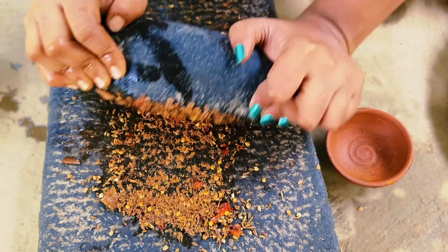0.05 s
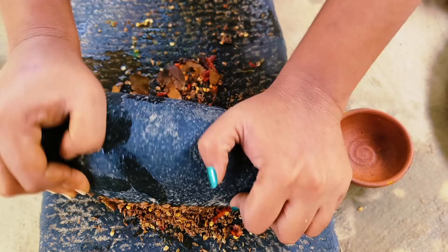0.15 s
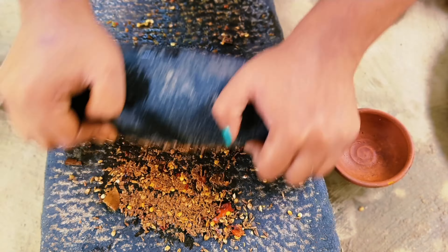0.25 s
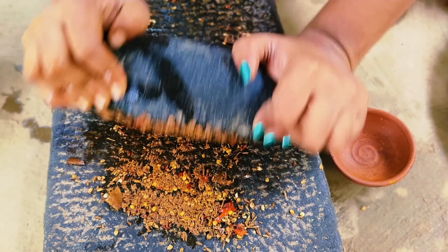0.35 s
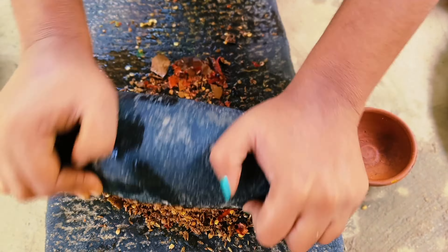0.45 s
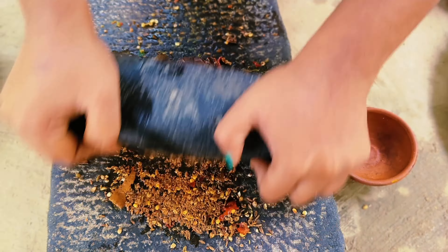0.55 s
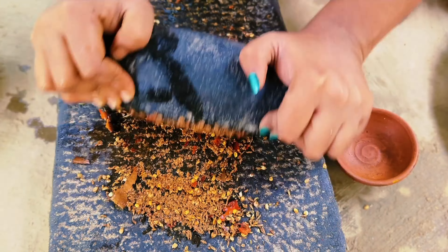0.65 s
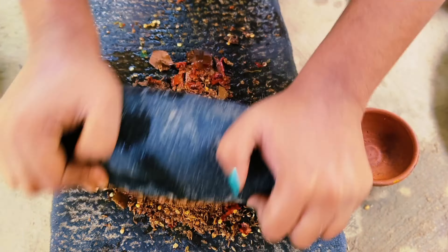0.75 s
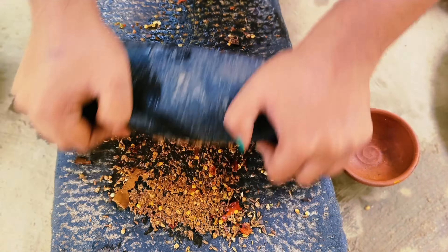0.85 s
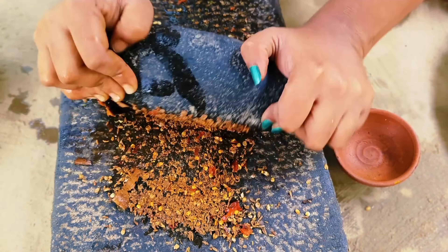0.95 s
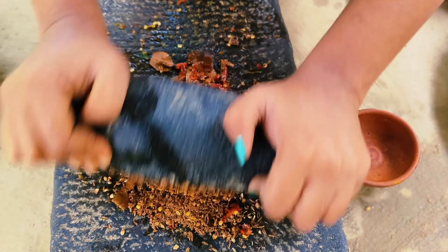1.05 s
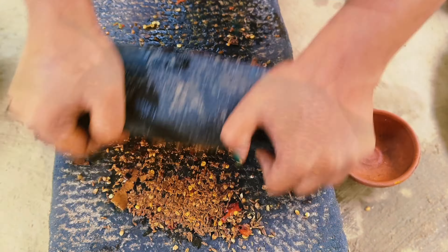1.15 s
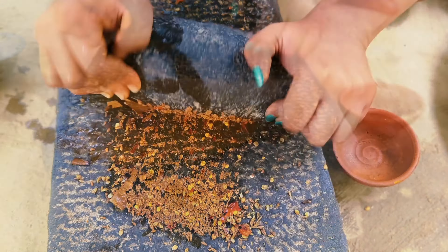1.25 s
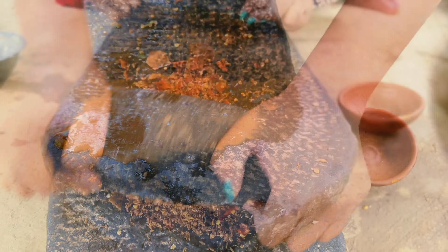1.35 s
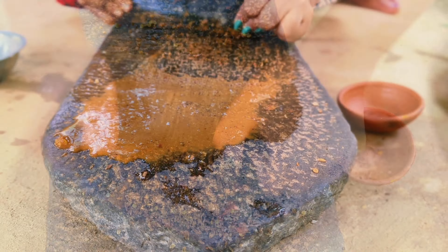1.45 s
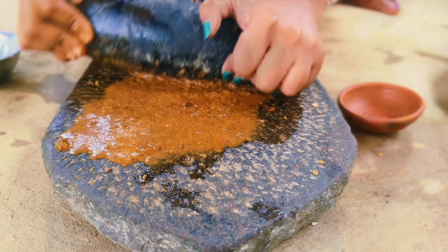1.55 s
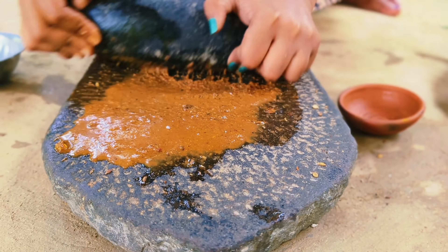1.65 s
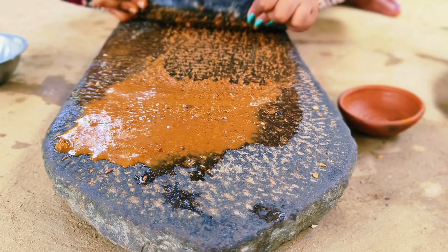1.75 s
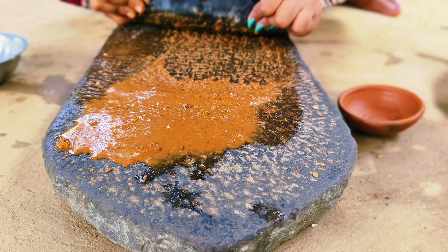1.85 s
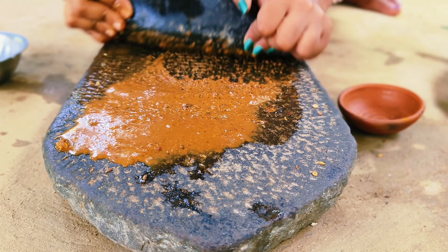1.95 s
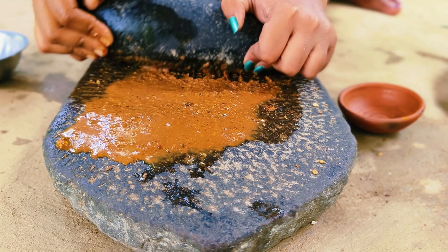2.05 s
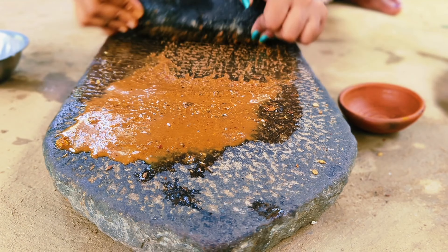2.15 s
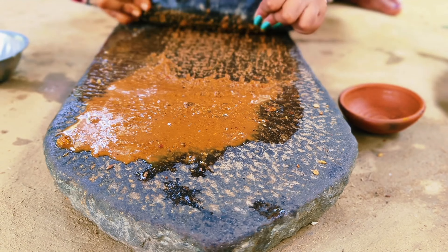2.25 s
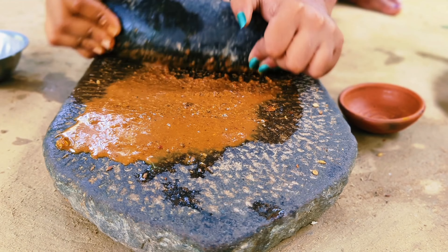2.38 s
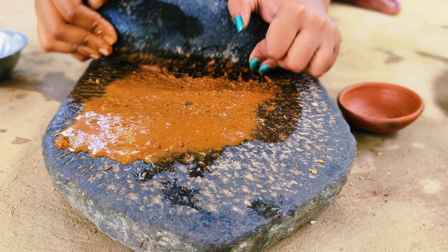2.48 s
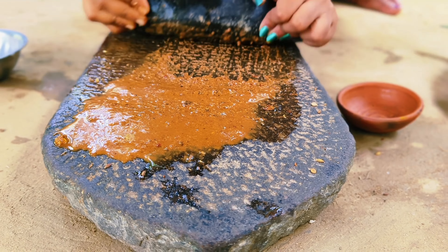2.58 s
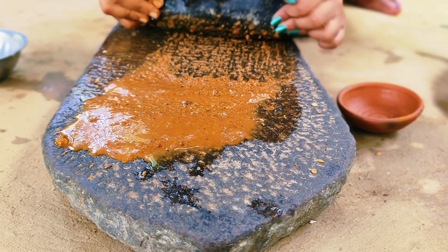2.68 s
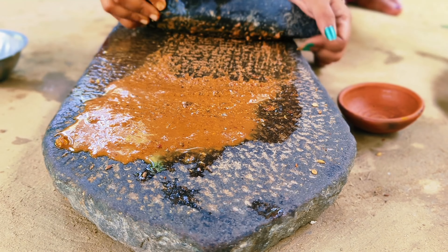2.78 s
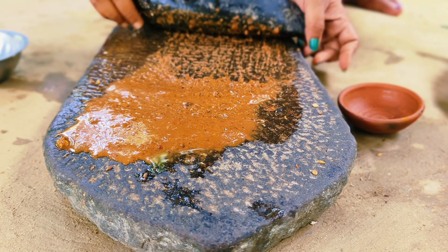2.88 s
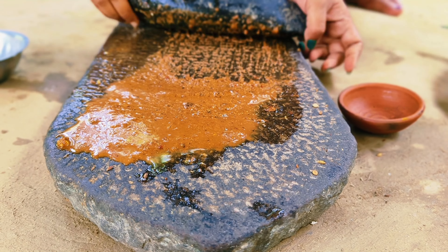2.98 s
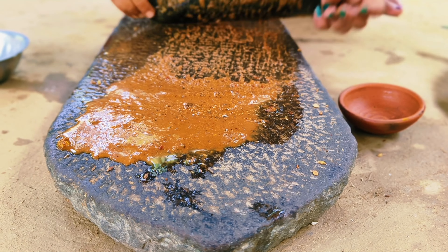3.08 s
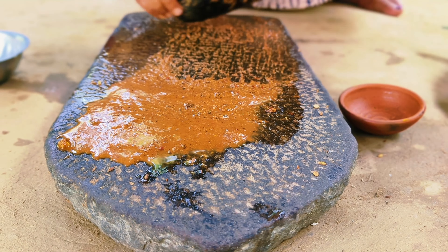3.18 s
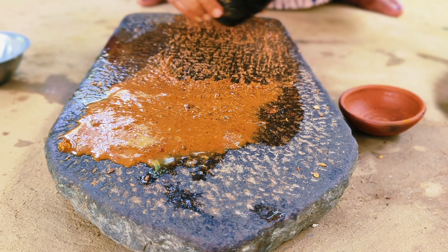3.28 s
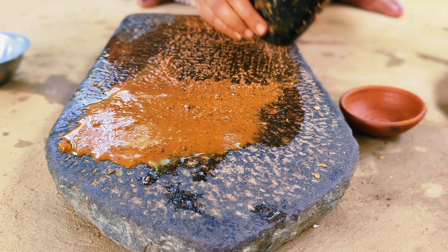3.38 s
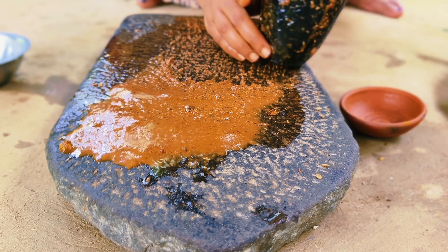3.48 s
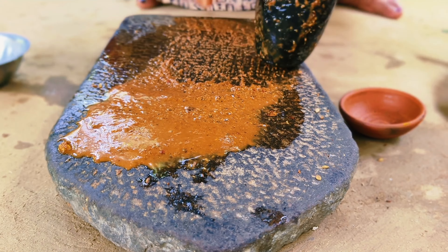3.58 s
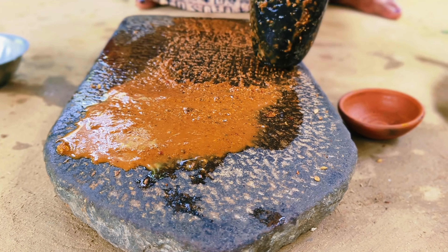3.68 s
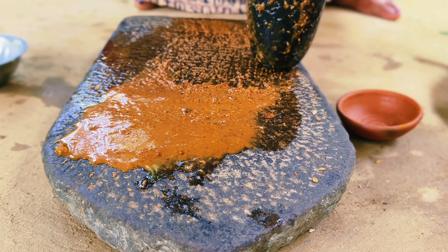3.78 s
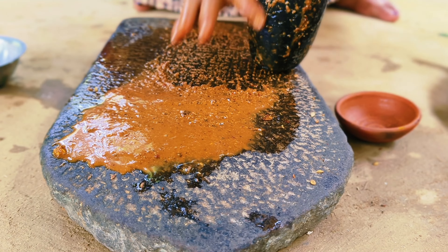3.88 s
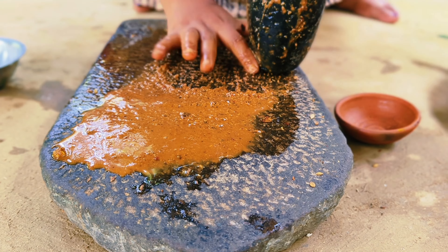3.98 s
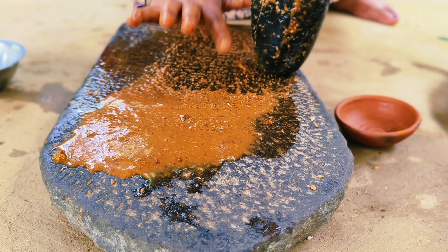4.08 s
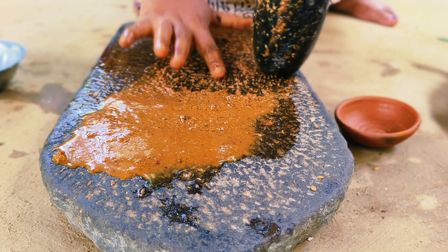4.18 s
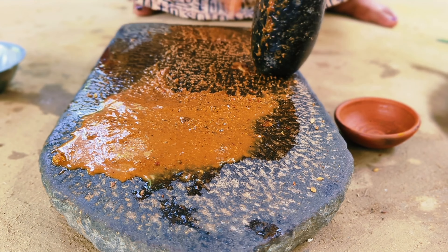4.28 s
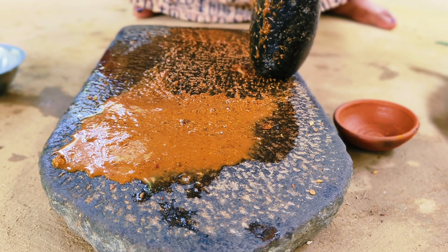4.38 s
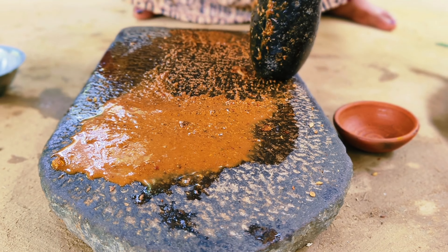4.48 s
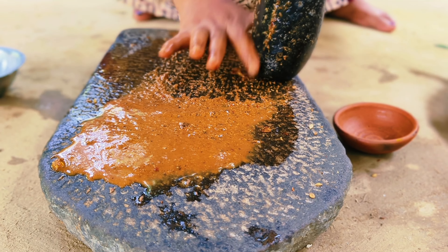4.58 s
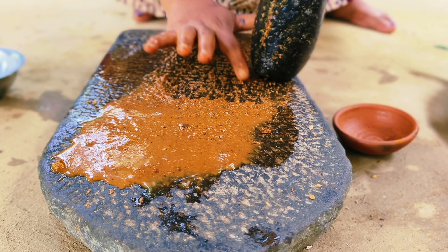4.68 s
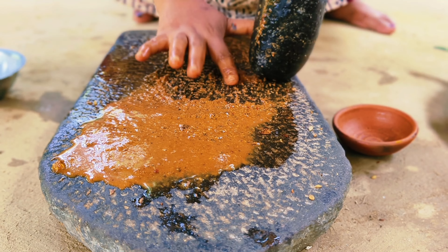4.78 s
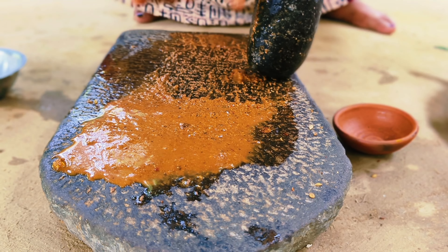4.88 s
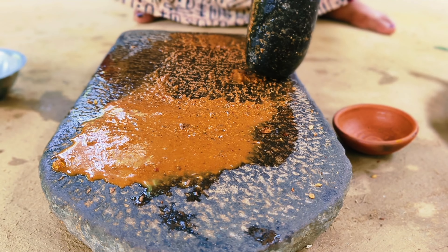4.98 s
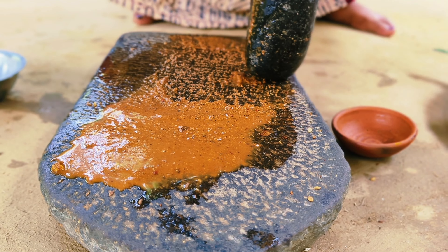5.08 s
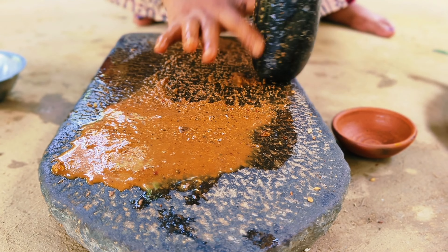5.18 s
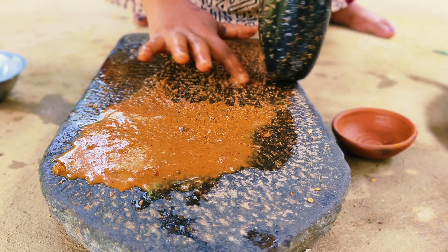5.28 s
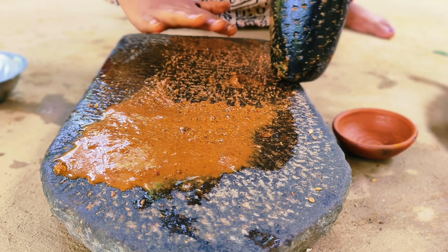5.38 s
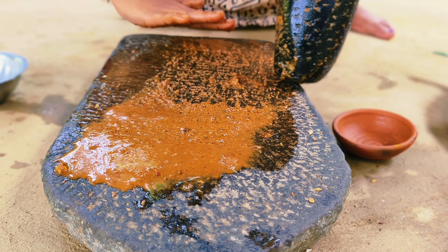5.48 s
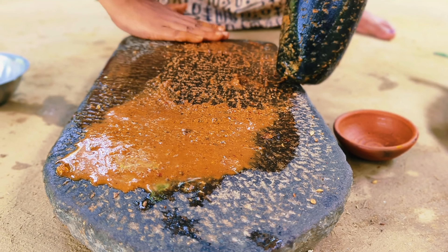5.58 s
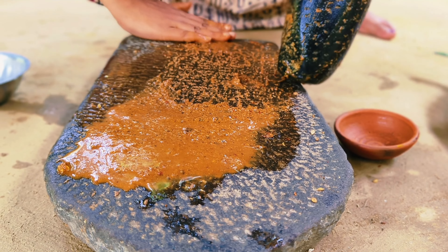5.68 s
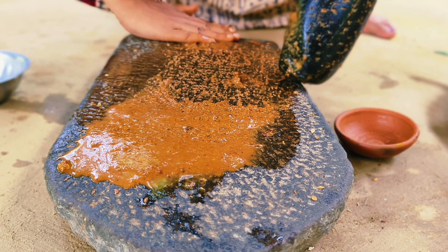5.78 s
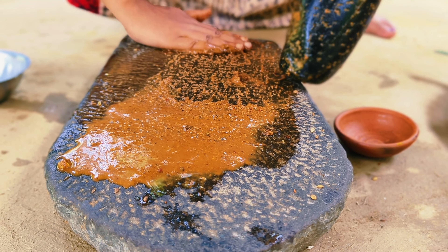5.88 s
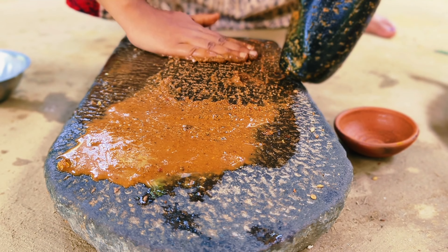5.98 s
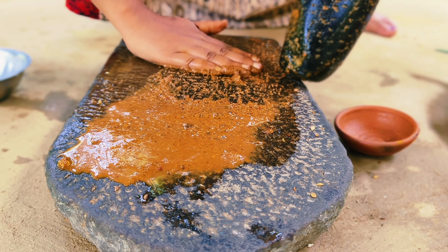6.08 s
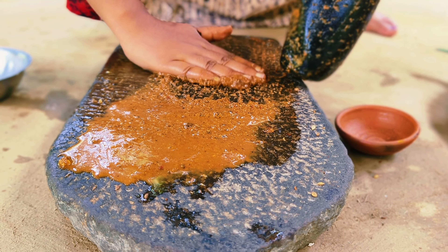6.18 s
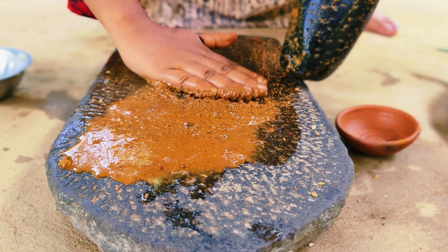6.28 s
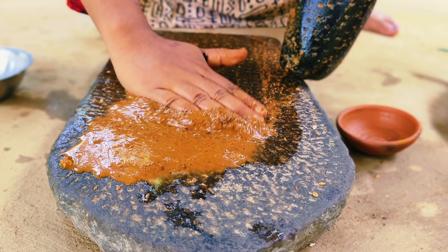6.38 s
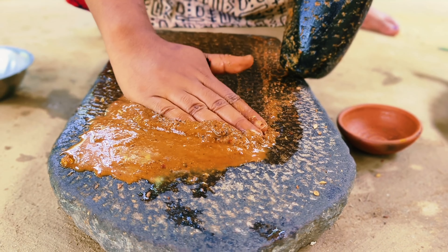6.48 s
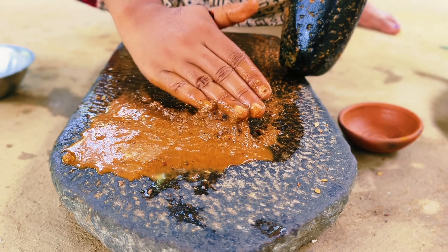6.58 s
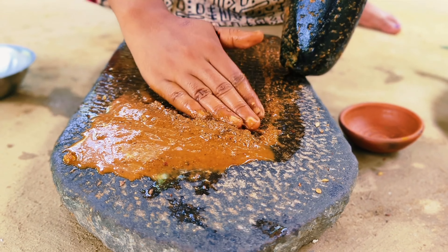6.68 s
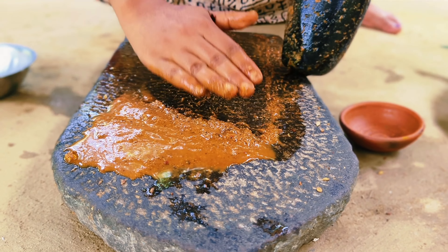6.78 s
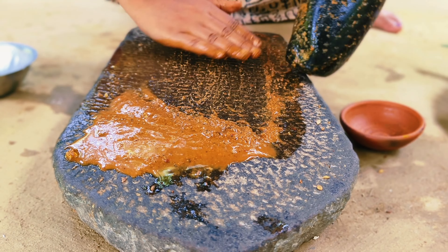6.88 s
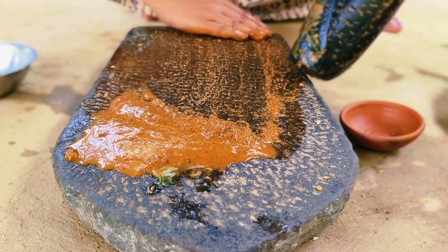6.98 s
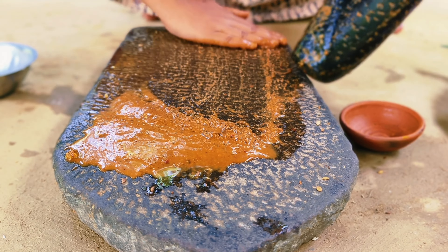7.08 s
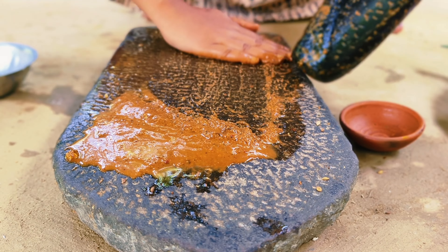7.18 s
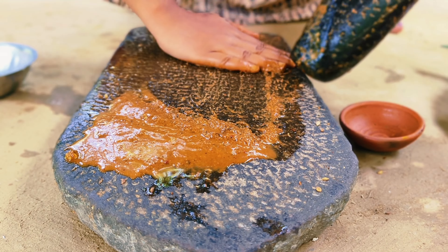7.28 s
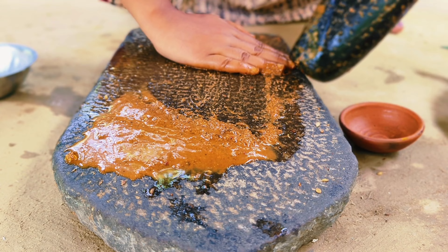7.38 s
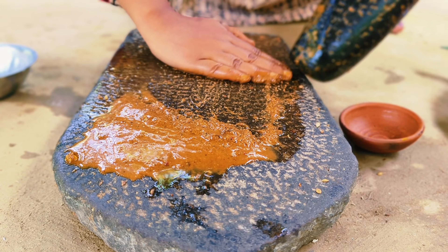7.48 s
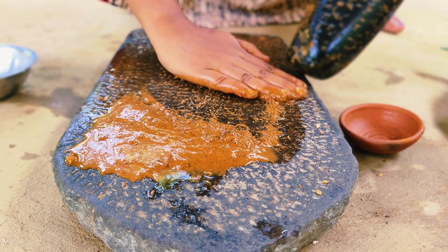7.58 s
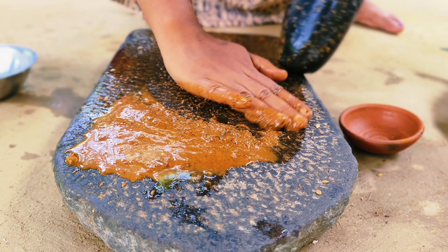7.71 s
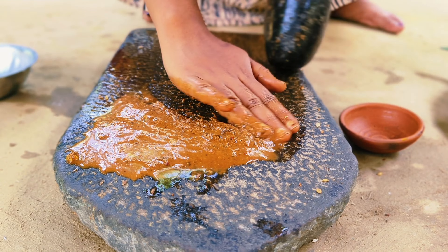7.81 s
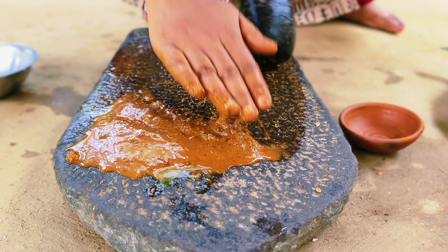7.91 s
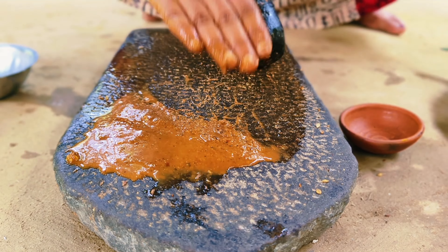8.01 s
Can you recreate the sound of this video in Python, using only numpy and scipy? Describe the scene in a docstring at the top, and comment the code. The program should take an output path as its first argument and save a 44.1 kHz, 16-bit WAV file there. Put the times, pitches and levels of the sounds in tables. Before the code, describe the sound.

Close up in an open walled yard, a heavy stone roller rasps back and forth over dry seeds with sharp crackle and hard knocks. At about a second and a half the strokes become wetter, more hollow and ringing. They stop, and one loud clunk stands the roller on end. Then small wet smacks and soft hand wipes follow, while a bird repeats a rising chirp, a far horn sounds faintly and a slow engine throbs.

```python
"""A stone roller is pushed to and fro over spices on a stone slab in a walled yard, dry seeds first, then wet paste.
Clicks excite the stone modes as chatter and knocks, one blow standing it on end; seeds crack as filtered grains.
Small smacks, drips and faint scrapes are ringing noise puffs; a hand wipes the paste as fine grains over a hiss.
A bird repeats a rising swept sine, others whistle farther off, a horn sounds in partials.
A slow engine throbs in orders of its firing rate, over soft banded background noise."""
import sys
import numpy as np
from scipy import signal
from scipy.fft import rfft, irfft
from scipy.io import wavfile
from scipy.ndimage import uniform_filter1d

SR = 44100
rng = np.random.default_rng(int(sys.argv[2]) if len(sys.argv) > 2 else 0)


def int16_out(signal):
    """Quantize to a 16-bit WAV file."""
    q = np.round(np.clip(np.atleast_2d(signal).T, -1, 1) * 32767)
    wavfile.write(sys.argv[1], SR, q.astype(np.int16))


N = 355005


def amp(db):
    """Decibels to gain."""
    return 10 ** (np.asarray(db) / 20)


def rms_one(x):
    """Scaled to rms 1."""
    return x / np.sqrt(np.mean(x ** 2) + 1e-20)


def in_time(rows):
    """Columns of a curve at every sample; the first column is seconds."""
    time_s, *columns = np.transpose(rows)
    return [np.interp(np.arange(N) / SR, time_s, column) for column in columns]


def at_hz(points):
    """A spectrum read at every FFT bin, linear in log frequency."""
    hz, value = np.transpose(points)
    return np.interp(np.log(np.fft.rfftfreq(N, 1 / SR) + 1), np.log(hz), value)


def coloured(x, spectrum):
    """Shaped by a spectrum in dB, rms 1."""
    return rms_one(irfft(rfft(x) * amp(at_hz(spectrum)), N))


def third_octave_index(base_hz):
    """Band number of every FFT bin; bands near a third of an octave well above base_hz."""
    return np.round(3 * np.log2(np.fft.rfftfreq(N, 1 / SR) / base_hz + 1))


def drift(rate_hz):
    """Slow chance of spread 1: two-pole lowpassed noise, computed at SR / 40."""
    r = np.exp(-80 * np.pi * rate_hz / SR)
    noise = rng.standard_normal(N // 40 + 2002)
    slow = signal.lfilter([1], [1, -2 * r, r * r], noise)[2000:]   # settled part
    return np.interp(np.arange(N) / 40, np.arange(len(slow)), rms_one(slow))


def grains(per_s, spread_db, channels=1):
    """Random clicks of uneven size and either sign."""
    size_db = spread_db * np.minimum(rng.exponential(1, (channels, N)), 4)
    sizes = amp(size_db) * rng.choice([-1, 1], (channels, N))
    return sizes * (rng.random((channels, N)) < per_s / SR)


def ring(clicks, hz, t60_s):
    """A two-pole mode with zeros at DC and Nyquist, so it passes nothing in the deep bass."""
    r, w = amp(-60 / (t60_s * SR)), 2 * np.pi * hz / SR
    return signal.lfilter([.5, 0, -.5], [1, -2 * r * np.cos(w), r * r], clicks + 1e-18)


def tone(hz, db):
    """A sine that follows a pitch curve."""
    return amp(db) * np.sin(2 * np.pi * np.cumsum(hz) / SR)


def high_pass(x, hz):
    """Third-order bass cut."""
    return signal.sosfilt(signal.butter(3, hz, "high", fs=SR, output="sos"), x)


def add(out, start_s, piece):
    """Mixes a piece in at a time."""
    i = round(start_s * SR)
    out[i:i + len(piece)] += piece[:N - i]


def tail(x, t60_s):
    """Diffuse echoes, other ones on each side: decaying noise of unit mean energy."""
    t = np.arange(round(t60_s * SR)) / SR
    echoes = rng.standard_normal((2, len(t))) * amp(-60 * t / t60_s)
    unit = echoes / np.sqrt(np.sum(echoes ** 2) / 2)
    return signal.fftconvolve(x[None], unit, axes=1)[:, :N]


def ports(x, lag_s, left_db):
    """Two microphone ports: a positive lag delays the right one; lag and balance may vary with pitch."""
    late = np.exp(-2j * np.pi * np.fft.rfftfreq(N, 1 / SR) * lag_s)
    gains = np.array([amp(left_db / 2) + 0 * late, late * amp(-left_db / 2)])
    return irfft(rfft(x) * gains, N)


# Background noise. Each row: time in seconds, level in dB, extra level below about 800 Hz in dB.
AIR_LEVEL = [(0.0, -53, -1), (1.05, -56.5, 4.5), (2.3, -68, 5.5), (2.69, -61.5, 6.5), (3.45, -55, 1),
             (3.7, -63.5, 3.5), (5.3, -59.5, 0), (5.45, -56.5, 4), (6.99, -55.5, 2.2), (8.05, -51.5, 1)]
# Its spectrum. Each row: frequency in Hz, relative density in dB.
AIR_COLOUR = [(100, 1), (170, -9.5), (310, -13), (414, -7.5), (800, -8), (973, -6.5), (1070, -3),
              (1750, -6), (4110, -19.5), (5060, -11), (9650, -33.5), (11900, -85), (15800, -62.5)]
# Correlation of the two sides. Each row: frequency in Hz, share from -1 to 1.
SIDE_LIKENESS = [(60, 0.42), (130, 0.9), (290, 0.47), (640, -0.45), (1410, -0.66), (3100, 0.44),
                 (6820, -0.65), (15000, 0.072)]


def air():
    """Soft background noise whose bands waver in level by chance; likeness of the sides varies with pitch."""
    mid, side = rfft(rng.standard_normal((2, N))) * amp(at_hz(AIR_COLOUR))
    alike = np.clip(at_hz(SIDE_LIKENESS), -1, 1)
    both = np.sqrt(1 + alike) * mid + np.sqrt(1 - alike) * side * [[1], [-1]]
    level_db, bass_db = in_time(AIR_LEVEL)
    band = third_octave_index(60)
    bands = 0
    for k in range(3, 24):
        waver_db = 2 * drift(9) + 2 * drift(2.5) + bass_db * (k < 12)
        bands = bands + irfft(both * (band == k), N) * amp(waver_db)
    return amp(level_db) * rms_one(bands)


# Distant engine. Each row: time in seconds, firings per second, level in dB.
ENGINE_RUN = [(.9, 18.2, -73), (1.0, 18.3, -66), (1.49, 17.9, -57.5), (3.45, 18.5, -46), (3.59, 18.4, -52),
              (5.3, 18.6, -50.5), (5.75, 17.9, -51.5), (6.24, 17.6, -49), (8.05, 18.3, -48.5)]
# Its orders. Each row: multiple of the firing rate, relative level in dB.
ENGINE_ORDERS = [(2, -9), (3, 0), (4, -6), (5, -4), (6, -11), (7, -16), (8, -19)]


def engine():
    """Low orders of the firing rate, each wavering in level and phase, over a dull rumble."""
    firing_hz, level_db = in_time(ENGINE_RUN)
    turns = np.cumsum(firing_hz) / SR
    orders = 0
    for k, order_db in ENGINE_ORDERS:
        gain = amp(order_db + 3 * drift(.7))
        orders = orders + gain * np.sin(2 * np.pi * (k * turns + .2 * drift(.5)))
    rumble_colour = [(30, -28.5), (60, 13.5), (95, 9.0), (140, -2.0), (230, -13.0), (500, -72)]   # Hz, dB
    rumble = coloured(rng.standard_normal(N), rumble_colour)
    return amp(level_db) * (rms_one(orders) + amp(-8) * rumble)


# Far whistles. Each row: start in seconds, length in seconds, start pitch in Hz, end pitch in Hz, level in dB.
WHISTLES = [(2.985, 0.054, 4980, 4160, -61), (3.05, 0.077, 3350, 2360, -51),
            (3.468, 0.016, 6000, 3760, -54.5), (3.512, 0.067, 3430, 2380, -56.5),
            (5.037, 0.038, 2740, 2696, -63), (5.311, 0.089, 2640, 2810, -65.5),
            (7.177, 0.033, 1900, 2110, -62), (7.878, 0.16, 2783, 2750, -57)]
# Far horn. Each row: start in seconds, length in seconds, nominal pitch in Hz,
# third, fourth and fifth partial in dB.
HORN = [(6.72, 0.16, 490, -74.5, -75, -64), (7.105, 0.23, 494, -71, -91, -63),
        (7.39, 0.11, 503, -85, -68.5, -76)]


def far_calls():
    """Gliding sines for the whistles, stacked partials for the horn, on one shared level waver."""
    out, waver_db = np.zeros(N), 5.5 * drift(22)
    for start_s, length_s, start_hz, end_hz, db in WHISTLES:
        size = round(length_s * SR)
        waver = waver_db[round(start_s * SR):][:size]
        whistle = tone(np.geomspace(start_hz, end_hz, size), db + waver)
        add(out, start_s, signal.windows.tukey(size, .4) * whistle)
    for start_s, length_s, hz, *partials_db in HORN:
        size = round(length_s * SR)
        waver = waver_db[round(start_s * SR):][:size]
        sag = np.linspace(1.01, .995, size)   # it sags and wavers on the wind
        for k, db in enumerate(partials_db, start=3):
            add(out, start_s, signal.windows.tukey(size, .5) * tone(k * hz * sag, db + waver))
    return out


# One call of the near bird, unscaled. Each row: time in seconds, pitch in Hz, relative level in dB.
CALL_SHAPE = [(0, 2560, -9.5), (0.014, 2688, 1), (0.039, 3235, 3.5), (.06, 3750, -0.5), (.072, 4500, 1),
              (.082, 5000, 1.5), (0.107, 4780, -9)]
# Its repeats. Each row: start in seconds, level in dB, length factor, pitch factor.
CALL_REPEATS = [(3.853, -56, 0.98, 1.07), (4.131, -53.5, 1.08, 1.014), (4.447, -52, 1.09, 1.014),
                (4.741, -52, 1.05, 1.01), (5.084, -52, 1.1, 1.02), (5.488, -54.5, 1, 1.017)]


def near_bird():
    """A near-sine sweep with a fast amplitude flutter."""
    out, (shape_s, shape_hz, shape_db) = np.zeros(N), np.transpose(CALL_SHAPE)
    for start_s, db, length, pitch in CALL_REPEATS:
        t = np.arange(round(shape_s[-1] * length * SR)) / SR
        flutter = 1 + 0.17 * np.sin(2 * np.pi * 95 * t)
        hz = pitch * np.interp(t, shape_s * length, shape_hz)
        level_db = db + np.interp(t, shape_s * length, shape_db)
        add(out, start_s, flutter * tone(hz, level_db))
    return out


# Faint steady treble hiss, dipping after the blow. Each row: time in seconds, level in dB.
HISS_LEVEL = [(2.6, -76), (2.8, -65), (3.46, -72), (3.56, -82), (3.9, -70.5), (5.7, -70), (8.05, -70)]
# Hand sweeps over paste. Each row: time of the peak in seconds, level in dB.
WIPES = [(3.998, -64), (5.9, -61), (6.321, -57.5), (7.16, -54.5)]
# Spectrum of hiss and wipes. Each row: frequency in Hz, relative density in dB.
WIPE_COLOUR = [(900, -37), (2200, -10), (5000, 5.5), (7000, 4.5), (9000, -3.5), (12000, -20.5),
               (16000, -14)]
WIPE_RISE_DB_PER_S, WIPE_FADE_DB_PER_S = 254, 67


def hiss_and_wipes():
    """Fine grains: a faint treble hiss, and sweeps of the hand that rise fast and fade."""
    t, (level_db,) = np.arange(N) / SR, in_time(HISS_LEVEL)
    for peak_s, top_db in WIPES:
        drop_db = np.maximum(WIPE_RISE_DB_PER_S * (peak_s - t), WIPE_FADE_DB_PER_S * (t - peak_s))
        level_db = np.maximum(level_db, top_db - drop_db)
    fine = coloured(grains(6000, spread_db=2.5, channels=2), WIPE_COLOUR)
    return amp(level_db + 1.5 * drift(30) + 2.5 * drift(7)) * fine


def small_smacks(per_s, db):
    """Rows of fainter smacks at random: time in seconds, level in dB, pitch in Hz."""
    at, place, size = rng.random((3, round(per_s * N / SR)))
    pitch_hz = np.geomspace(1300, 2500, 50)[(place * 50).astype(int)]
    return np.transpose([at * N / SR, db + 10 * size ** 2, pitch_hz])


def bursts(events, burst_s, cycles):
    """Noise puffs, 40 dB down per burst_s, ring a small cavity or edge twice with a t60 of so many cycles."""
    out, t = np.zeros(N), np.arange(SR // 12) / SR
    puff = (1 - np.exp(-8 * t / burst_s)) * amp(-40 * t / burst_s)
    for (start_s, db, hz), noise in zip(events, rng.standard_normal((len(events), len(t)))):
        burst = ring(ring(noise * puff, hz, cycles / hz), hz, cycles / hz)
        add(out, start_s, amp(db) * burst / np.abs(burst).max())
    return out


# Small smacks, drips and faint scrapes. Each row: start in seconds, level in dB, pitch in Hz.
SMACKS = [(0.509, -43, 1064), (0.829, -47.5, 1076), (2.849, -50, 1180), (2.894, -42, 1980),
          (3.26, -44, 1670), (3.363, -45, 2100), (3.976, -42.5, 1940), (4.668, -49, 1016),
          (4.849, -43.5, 2190), (5.287, -40, 1700), (5.405, -41.5, 1890), (5.859, -38, 1300),
          (6.094, -45, 1720), (6.19, -45.5, 2180), (6.701, -37.5, 1810), (6.844, -40, 1310),
          (7.563, -43, 1980), (7.575, -46.5, 2980), (7.6, -45, 1240), (7.667, -44.5, 1750),
          (7.825, -47, 468), (7.912, -42.5, 1033)]
# Dry ticks. Each row: start in seconds, level in dB, pitch in Hz.
TICKS = [(0.0435, -15, 5400), (1.174, -23.5, 6960), (1.384, -23, 7300), (1.808, -22.5, 11000),
         (3.499, -33, 6020), (3.9846, -28.5, 4880), (4.0344, -34.5, 6200), (4.2787, -36.5, 4630),
         (5.9165, -42, 9150), (6.3096, -36.5, 7880), (6.698, -21.5, 6500), (7.267, -46, 12500),
         (7.8825, -35, 4570)]


def smacks_and_ticks():
    """Listed and random small smacks ring long; dry ticks ring short and are softened by a one-pole lowpass."""
    smacks = bursts(SMACKS, burst_s=0.038, cycles=21.6)
    smacks = smacks + bursts(small_smacks(30, db=-57.5), burst_s=0.05, cycles=20.0)
    return smacks + signal.lfilter([.4], [1, -.6], bursts(TICKS, burst_s=0.013, cycles=4.6))


WET_FROM_S = (1.5, 1.58)   # dry seed gives way to paste


def wetness():
    """0 on dry seed, 1 on paste."""
    return np.interp(np.arange(N) / SR, WET_FROM_S, [0, 1])


def stroke_level(rows, sinks):
    """Speed swells and dies from turn to turn; the level sinks from its top as the speed falls."""
    out, t = np.full(N, -100.), np.arange(N) / SR
    for (start_s, length_s, fastest, db), (depth_db, bend) in zip(rows, sinks):
        first = max(round((start_s - .025) * SR), 0)   # it rests at the turn
        on = slice(first, round((start_s + length_s + .025) * SR))
        turn_s = [start_s, start_s + fastest * length_s, start_s + length_s]
        speed = np.sin(np.pi * np.interp(t[on], turn_s, [0, .5, 1]))
        out[on] = np.maximum(out[on], db - depth_db * np.abs(1 - speed) ** bend)
    return uniform_filter1d(out, size=441)


# Roller strokes, turn to turn. Each row: start in seconds, length in seconds, fastest at share 0-1,
# top grit in dB, top chatter in dB, low modes in dB, top thrum in dB.
STROKES = [(-.1, 0.12, 0.98, -41.5, -56, -21, -35), (0.031, 0.17, 0.81, -31.5, -54.5, 1, -39.5),
           (0.204, 0.35, 0.23, -40.5, -61.5, 6, -42), (0.365, 0.14, 0.55, -30.5, -51.5, 9, -40),
           (0.519, 0.13, 0.78, -35, -54.5, -18, -41), (0.686, 0.13, 0.7, -33, -51, 9, -39),
           (0.833, 0.13, 0.73, -36, -57, -28, -38), (0.932, 0.22, 0.69, -39.5, -47.5, -3, -48.5),
           (1.112, 0.36, 0.19, -43.5, -73, 10, -42.5), (1.226, 0.22, 0.65, -42, -35.5, -5, -38.5),
           (1.42, 0.22, 0.55, -43.5, -33, 0, -42), (1.638, 0.22, 0.71, -43, -40.5, 17, -35.5),
           (1.857, 0.2, 0.62, -42.5, -30, -5, -40), (2.101, 0.17, 0.84, -44.5, -34.5, 9.5, -34),
           (2.288, 0.18, 0.71, -42, -31, 2, -41), (2.503, 0.19, 0.76, -47, -42, 6, -46),
           (2.674, 0.094, 0, -51.5, -79, 11, -65)]
# How each layer sinks as the roller slows, one row for dry seed, one for paste.
# Each row: depth at the turn in dB, bend exponent.
GRIT_SINKS = [(17, 0.78), (22, 2.6)]
CHATTER_SINKS = [(12, 0.89), (26, 0.82)]
THRUM_SINKS = [(21, 1), (11.7, 0.66)]
# The slab is jarred by the blow, later nudged. Each row: start in seconds, length in seconds,
# fastest at share 0-1, top thrum in dB.
SLAB_NUDGES = [(3.492, 0.081, 0.2, -41.5), (7.76, 0.26, 0.77, -49.5)]
WET_STROKE = 9   # index of the first stroke on paste


def strokes():
    """Levels of grit, chatter and thrum, and the level of the low modes, stroke by stroke."""
    rows = np.array(STROKES)
    wet = (np.arange(len(rows)) >= WET_STROKE).astype(int)

    def level(column, sinks):
        """Level of one layer over all strokes."""
        return stroke_level(rows[:, [0, 1, 2, column]], np.array(sinks)[wet])

    grit_db, chatter_db = level(3, GRIT_SINKS), level(4, CHATTER_SINKS)
    nudge_db = stroke_level(SLAB_NUDGES, THRUM_SINKS[1:] * len(SLAB_NUDGES))
    thrum_db = np.maximum(level(6, THRUM_SINKS), nudge_db)
    middle_s = rows[:, 0] + rows[:, 1] / 2
    low_db, = in_time(np.transpose([middle_s, rows[:, 5]]))
    return grit_db, chatter_db, low_db, thrum_db


# Slab on the ground. Each row: frequency in Hz, width of one resonator pass in Hz, relative level in dB.
SLAB_MODES = [(125, 51, -5), (162.5, 50, -3.5), (209, 46, -10.5)]


def thrum(thrum_db):
    """The slab rocks on the ground: noise through doubled low resonances."""
    modes = 0
    for hz, width_hz, db in SLAB_MODES:
        t60_s = np.log(1000) / (np.pi * width_hz)
        mode = ring(ring(rng.standard_normal(N), hz, t60_s), hz, t60_s)
        modes = modes + amp(db) * rms_one(mode)
    return amp(thrum_db) * rms_one(high_pass(modes, 44))


# Spectrum of crushed seed. Each row: frequency in Hz, relative density in dB.
GRIT_COLOUR = [(880, -64), (1500, -16.5), (1850, -14.5), (2530, -10), (3530, -7.5), (3940, -3.5), (5400, 2),
               (5840, -5), (7330, -6.5), (8660, -17), (11800, -14), (15800, -15.5)]
# Stereo balance of the grit. Each row: frequency in Hz, left minus right in dB.
GRIT_BALANCE = [(2400, 3.5), (4400, -1.5), (8000, 8.5), (15000, -4.5)]
DULL_LOW_HZ, DULL_HIGH_HZ, DULL_DB = 6500, 9500, -1.5   # wet paste mutes a band of the crackle
GRIT_LOWS_FOLLOW = .3   # share of the low modes' swing taken by the lower crackle on dry seed


def grit(grit_db, low_db):
    """Thousands of seeds crack along the roller; the crackle clumps, and its colour wanders band by band."""
    clicks = grains(4500 * amp(4.2 * drift(35)), spread_db=3.0, channels=2)
    cracks = rfft(coloured(clicks, GRIT_COLOUR)) * amp(at_hz(GRIT_BALANCE) * [[.5], [-.5]])
    band = third_octave_index(1000)
    wet = wetness()
    dull_db, lows_db = DULL_DB * wet, GRIT_LOWS_FOLLOW * low_db * (1 - wet)
    patches = 0
    for k in range(1, 13):
        muted = DULL_LOW_HZ < 1000 * (2 ** (k / 3) - 1) < DULL_HIGH_HZ
        patch_db = 3 * drift(8) + muted * dull_db + (k < 7) * lows_db   # lows: below about 3.5 kHz
        patches = patches + irfft(cracks * (band == k), N) * amp(patch_db)
    return amp(grit_db) * rms_one(patches)


# Modes of roller and slab. Each row: frequency in Hz, relative level in dB, t60 in seconds before scaling.
STONE_MODES = [(183.7, -4.5, 0.214), (323, -2, 0.024), (486, -15, 0.096), (564, -9.5, 0.085),
               (727, -1.5, 0.034), (850, -7.5, 0.07), (1205, -4.5, 0.12), (1235.4, 16.5, 0.11),
               (1318, 2.5, 0.089), (1640, 0.5, 0.042), (2100, 3, 0.034), (2370, -9.5, 0.06),
               (3100, -14.5, 0.099), (5400, -22.5, 0.023)]


def scrape_song(song_db):
    """On wet paste the sliding roller sings in its three highest modes, in snatches that wander in pitch."""
    song = 0
    for (hz, _, _), width_hz, gain_db in zip(STONE_MODES[-3:], (140, 120, 260), (-9, -4, -6)):
        lowpass = signal.butter(2, width_hz, fs=SR, output="sos")
        rub = signal.sosfilt(lowpass, rng.standard_normal((2, N)))
        carrier = tone(hz * (1 + .025 * drift(6)), gain_db + 3.9 * drift(18.0))
        song = song + rms_one(rub) * carrier
    return wetness() * amp(song_db) * song


GLIDE_LOW_HZ, GLIDE_HIGH_HZ, GLIDE_WIDTH_HZ, GLIDE_DB = 860, 1240, 70, -2


def glide(clicks):
    """The main resonance follows the roller's place: it climbs through each push on paste, else rests high."""
    rows = []
    for start_s, length_s, fastest, *_ in STROKES[WET_STROKE + 1::2]:
        rows += [(start_s, GLIDE_HIGH_HZ), (start_s + .02, GLIDE_LOW_HZ)]
        rows.append((start_s + fastest * length_s, GLIDE_HIGH_HZ))
    turn = np.exp(2j * np.pi * np.cumsum(in_time(rows)[0]) / SR)
    r = np.exp(-np.pi * GLIDE_WIDTH_HZ / SR)
    # shift the clicks down to DC, lowpass, shift back
    resonance = np.real(turn * signal.lfilter([1], [1, -r], clicks / turn))
    return amp(GLIDE_DB + 3.0 * drift(30)) * rms_one(resonance)


def chatter(chatter_db, low_db):
    """Clumped clicks into the stone modes; each mode swells on its own as the contact moves."""
    clicks = grains(2600 * amp(6 * drift(35)), spread_db=4.0)[0]
    clicks = signal.lfilter([1], [1, -1.5, .5625], clicks)   # soft contacts
    low, high = 0, 0
    for hz, mode_db, t60_s in STONE_MODES[2:]:
        if 1000 < hz < 1300:   # the gliding resonance stands in for the main pair
            continue
        swell_db = 2.5 * drift(51) + 6.9 * drift(14)
        mode = amp(mode_db + swell_db) * ring(clicks, hz, 0.22 * t60_s)
        if hz < 1000:
            low = low + mode
        else:
            high = high + mode
    low = amp(low_db) * rms_one(high_pass(low, 336))
    return amp(chatter_db) * (low + rms_one(high) + glide(high_pass(clicks, 470)))


# Roller meets slab. Each row: time in seconds, level in dB, modes below 1000 Hz in dB,
# modes above 1450 Hz in dB, ring length factor.
KNOCKS = [(0.047, -4.5, 11.5, 8, 0.42), (0.399, -19.5, 12.5, 13, 1.3), (0.422, -21, 12, 14, 0.18),
          (0.673, -7, 11, 9.5, 0.24), (0.717, -20.5, 16, -1, 0.49), (0.9861, -11, 6, 10, 0.28),
          (1.0323, -9, 13.5, 10, 0.3), (1.0634, -17.5, 21, 18, 0.31), (1.288, -16.5, -3.5, 13, 1),
          (1.343, -20.5, 14.5, 9, 0.49), (1.493, -27, 7, 11, 0.18), (1.535, -13, -4, -2, 1.1),
          (1.581, -16.5, 11, -8, .2), (1.596, -15, 9, -8, 0.32), (1.666, -25.5, 4, 9, 0.45),
          (1.7, -22.5, 8, 6, 0.34), (1.708, -14, -4, 7, 0.53), (1.73, -11.5, -1.5, 5, 0.53),
          (1.762, -13, 1, 12, 0.28), (1.809, -17.5, 30, 26, 0.067), (1.979, -22.5, 13, -9, 0.22),
          (1.993, -14.5, 5, -15, 0.29), (2.007, -17.5, 9, -16, 0.25), (2.035, -20, 23.5, -10, 0.57),
          (2.139, -23, 3, -1, 0.66), (2.187, -14.5, 6, 15, 0.32), (2.213, -19, 44, -19, 0.44),
          (2.249, -18.5, 13, 5, 0.081), (2.333, -23, 1, 9, 0.096), (2.389, -20.5, 4, -10, 0.67),
          (2.402, -19, 0, -10, 0.34), (2.419, -14.5, 11.5, -18, 0.16), (2.474, -25.5, 24, 2, 0.15),
          (2.545, -24.5, 2, -2, 0.84), (2.584, -15.5, -10, -2, 0.37), (2.662, -42, 26, 5, 0.18),
          (3.4995, -2.5, -2, 3.5, 0.31), (3.509, -8, -0.5, -4.5, 0.5), (3.524, -17, -1.5, -5, 0.41),
          (3.537, -25.5, 13.5, 5.5, 0.38), (7.829, -35.5, 24.5, 4, 0.47)]
# Rattle round a blow, one row for dry seed, one for paste. Each row: level in dB, rise in dB/s, fade in dB/s.
RATTLE = [(-15, 9000, 2100), (-11, 3600, 2000)]
LEAD_S = .01   # loose contacts gather before the main one
PUSH_S, PUSH_DB = 0.00014, -3.5   # width and dry-seed strength of the jolt that opens a blow
PASTE_CUSHION_DB = -7   # paste softens the jolt
SEED_DAMPS_DB = -13   # a bed of dry seed damps the modes below 650 Hz


def knocks():
    """Every blow is a short rattle of contacts that rings the same modes with strengths of its own."""
    out, t = np.zeros(N), np.arange(SR // 4) / SR
    hz, mode_db, t60_s = np.transpose(STONE_MODES)[:, :, None]
    chance = rng.normal(0, 1, (len(KNOCKS), 2, len(STONE_MODES), 1))
    since_s = t[:1600] - LEAD_S
    on_paste = (np.array(KNOCKS)[:, 0] > WET_FROM_S[0]).astype(int)
    rattle_db, rise, fade = np.array(RATTLE)[on_paste].T[:, :, None]
    envelope = amp(rattle_db + np.minimum(rise * since_s, -fade * since_s))
    rattle = rng.standard_normal((len(KNOCKS), len(since_s))) * envelope
    rattle[:, round(LEAD_S * SR)] = 1   # the main contact
    contact = signal.windows.hann(round(.0003 * SR) + 2)   # a rounded contact dulls the blow
    push = (t - LEAD_S - 3 * PUSH_S) / PUSH_S
    push = -push * np.exp(.5 - push ** 2 / 2)   # the jolt of the contact itself: one cycle
    for (time_s, db, low_db, high_db, length), (own, detune), contacts in zip(KNOCKS, chance, rattle):
        strength_db = mode_db + 3 * own + low_db * (hz < 1000) + high_db * (hz > 1450)
        strength_db = strength_db + SEED_DAMPS_DB * (hz < 650) * (time_s < WET_FROM_S[0])
        phase = 2 * np.pi * hz * (1 + 0.035 * detune) * t   # each mode is detuned a little at random
        modes = amp(strength_db - 60 * t / (t60_s * max(length, .1))) * np.sin(phase)
        upper = high_pass(np.sum(modes[2:], axis=0), 488)   # bass cut; the two deepest modes stay full
        blow = modes[0] + modes[1] + upper
        blow = signal.fftconvolve(blow, np.convolve(contacts, contact))[:len(t)]
        jolt = amp(PUSH_DB + PASTE_CUSHION_DB * (time_s > WET_FROM_S[0])) * push
        blow = blow / np.abs(blow).max() + jolt
        add(out, time_s - LEAD_S, amp(db) * blow / np.abs(blow).max())
    return high_pass(out, 200)


# Stereo balance of the slab. Each row: frequency in Hz, left minus right in dB.
SLAB_BALANCE = [(100, .5), (220, 0), (380, 6), (700, 1), (1300, 3.5), (2400, 4), (5000, 1)]
PORT_LAG_S = 0.00022   # the slab is nearer the left port
LAG_FADES_HZ = 2870   # above this the slab reaches both ports nearly together
WALL_S, WALL_DB = 0.0083, -22   # slap from the nearest wall
YARD_T60_S, TREES_T60_S = .22, .7
BEAK_CUT_HZ = 3270
SONG_FOLLOWS_CHATTER = 0.76   # share of the song level in dB taken from chatter, the rest from grit


def scene():
    """Slab close and a little left, birds in the trees, engine and background noise all round."""
    grit_db, chatter_db, low_db, thrum_db = strokes()
    stone = chatter(chatter_db, low_db) + knocks()
    slap = np.concatenate([np.zeros(round(WALL_S * SR)), stone])[:N]
    stone = stone + amp(WALL_DB) * slap
    small = smacks_and_ticks()
    lag_s = PORT_LAG_S / (1 + (np.fft.rfftfreq(N, 1 / SR) / LAG_FADES_HZ) ** 6)
    close = ports(stone, lag_s, at_hz(SLAB_BALANCE)) + ports(small, -0.000308, -6.5)
    close = close + amp(-11.0) * tail(stone, .018) + amp(-15.0) * tail(stone + small, YARD_T60_S)

    bird, far = near_bird(), far_calls()
    # the high notes beam away and arrive as echoes
    aside = signal.sosfilt(signal.butter(4, BEAK_CUT_HZ, fs=SR, output="sos"), bird)
    trees = ports(aside + far, .0001, -15.0) + amp(-13.0) * tail(bird, 0.15)
    trees = trees + amp(8) * tail(bird, TREES_T60_S) + amp(8.0) * tail(far, 0.47)

    song_db = grit_db + SONG_FOLLOWS_CHATTER * (chatter_db - grit_db)
    rubbing = ports(thrum(thrum_db), .0001, 1.8) + grit(grit_db, low_db) + scrape_song(song_db)
    return close + rubbing + hiss_and_wipes() + trees + engine() + air()


MIC_LOW_HZ, CUTOFF_HZ = 33, 16000


def record(dry):
    """The small microphones lose the deepest bass and round the highest peaks; the top is cut steeply."""
    thin = high_pass(dry, MIC_LOW_HZ)
    rounded = 1.15 * np.tanh(thin / 1.15)
    return signal.sosfilt(signal.cheby2(22, 70, CUTOFF_HZ, fs=SR, output="sos"), rounded)


dry = scene()
out = record(dry)
int16_out(out)
```